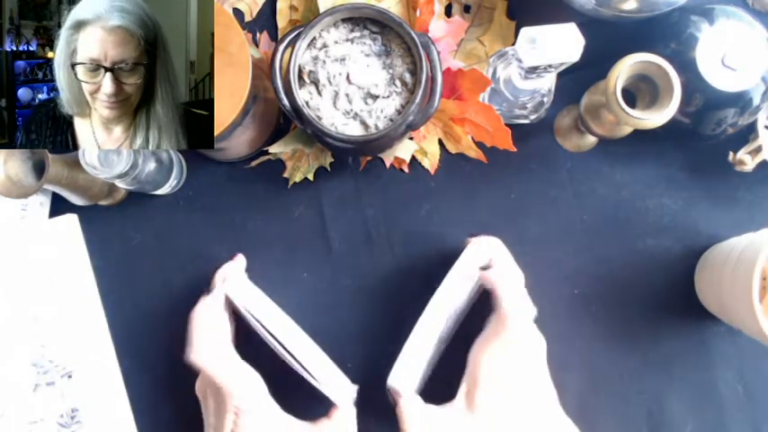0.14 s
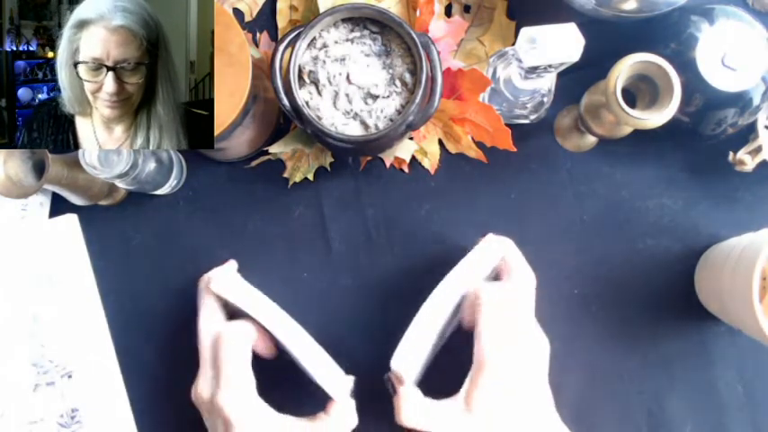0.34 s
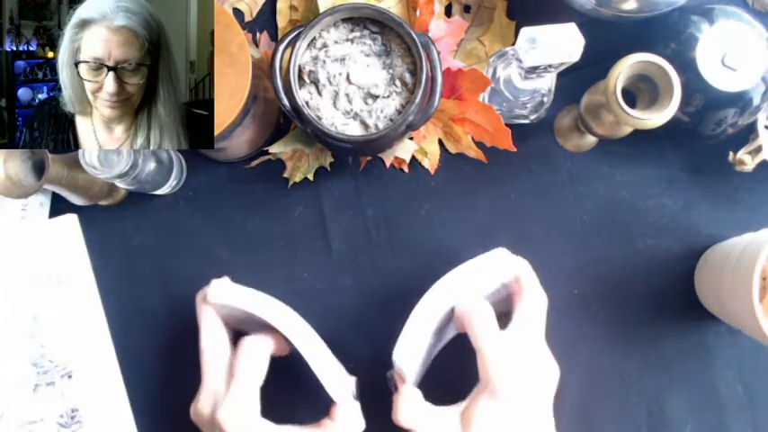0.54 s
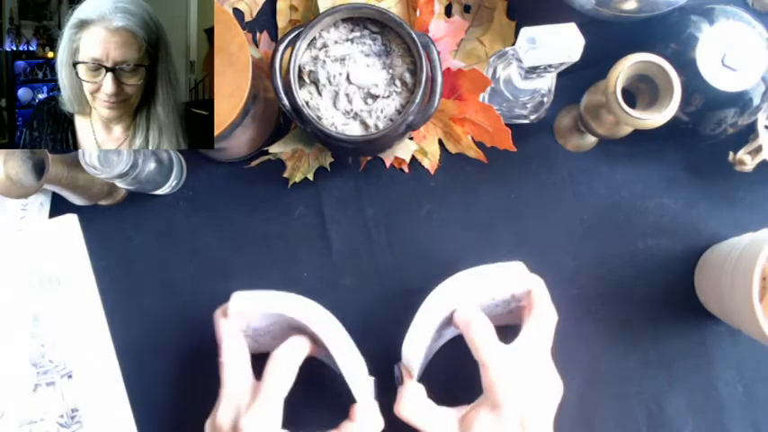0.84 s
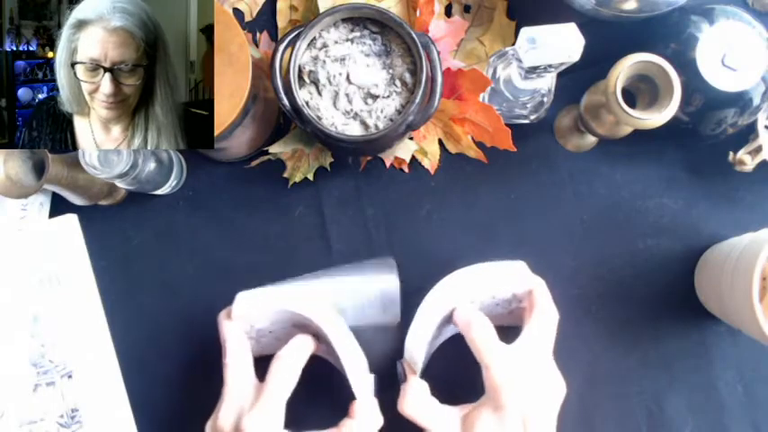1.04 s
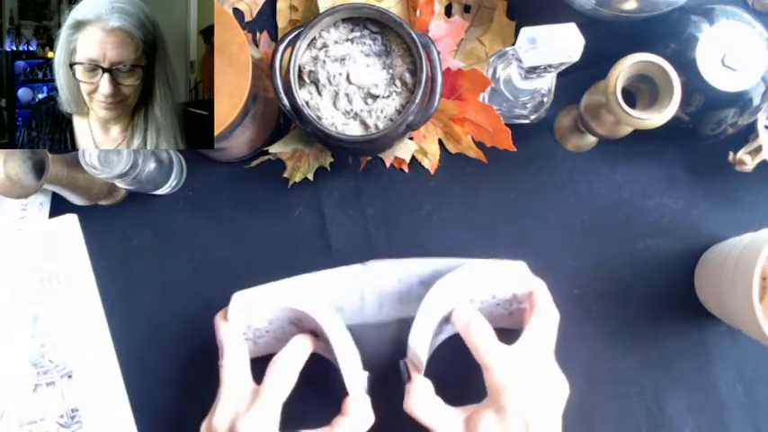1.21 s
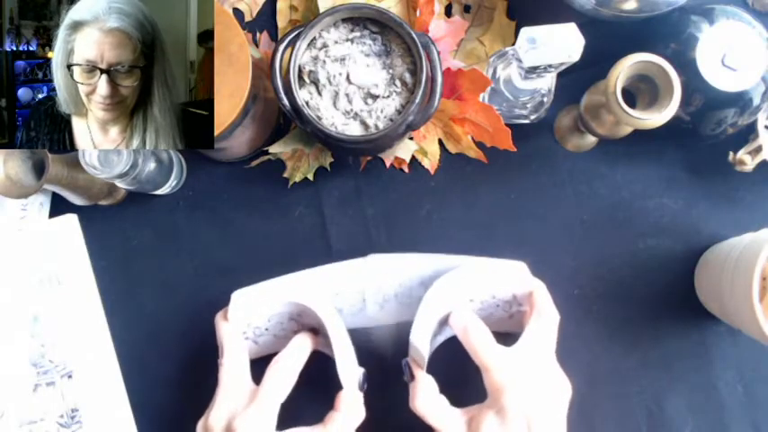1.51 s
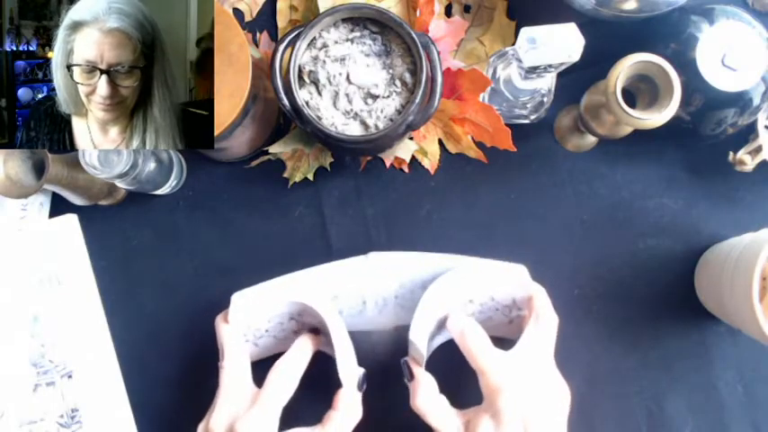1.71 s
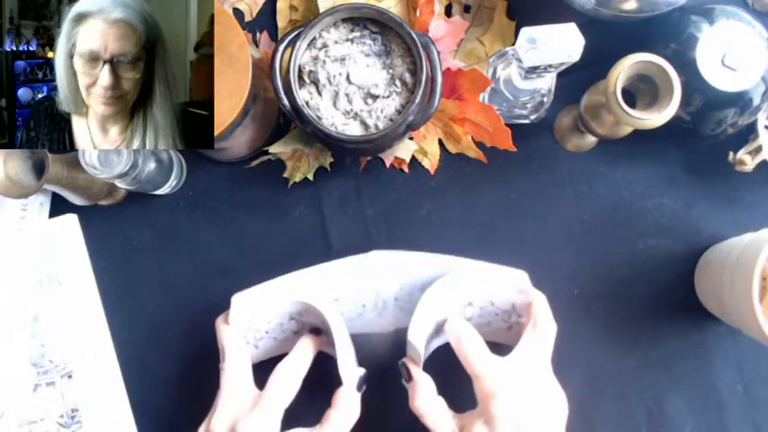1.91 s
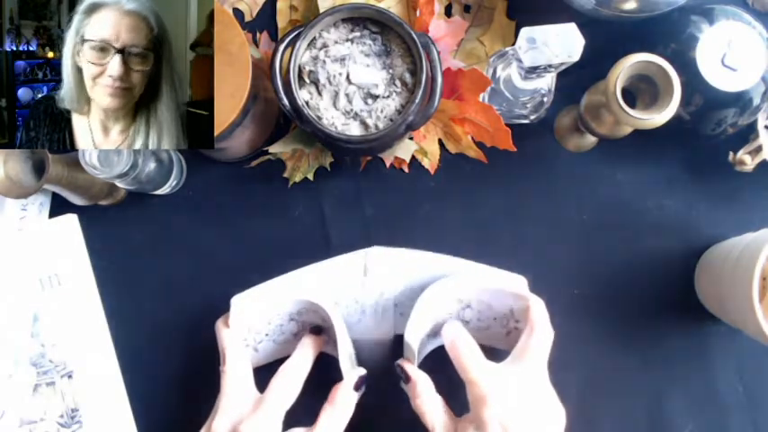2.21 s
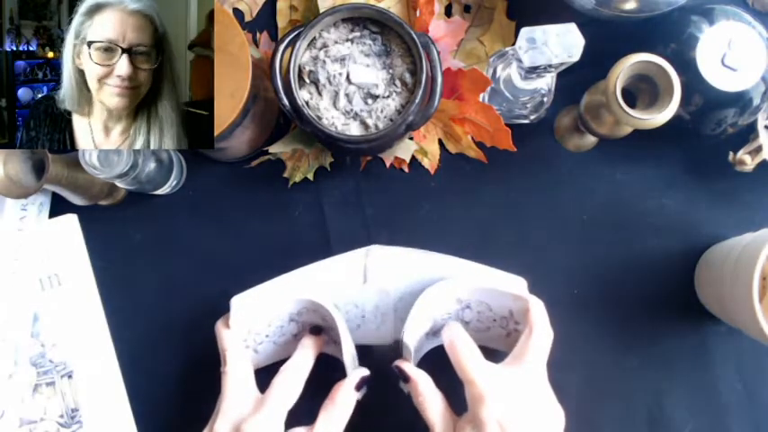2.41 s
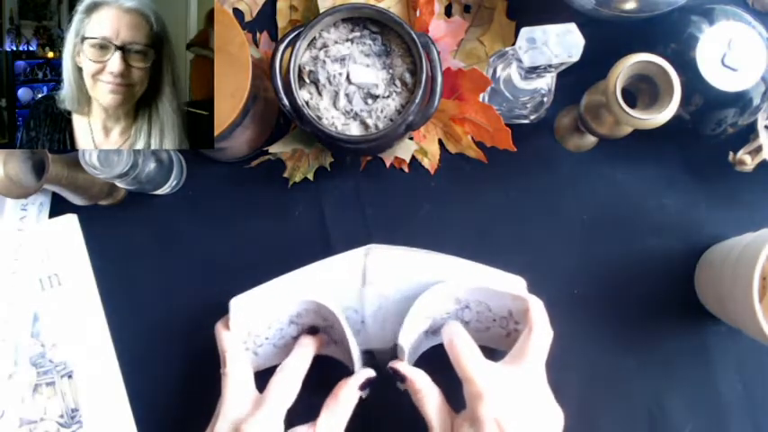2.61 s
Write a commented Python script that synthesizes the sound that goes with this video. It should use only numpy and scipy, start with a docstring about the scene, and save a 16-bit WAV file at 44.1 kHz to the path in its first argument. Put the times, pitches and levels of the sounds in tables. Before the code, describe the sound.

A deck of cards riffles together by hand in crisp, rapid, rising flicks.

```python
"""Playing cards riffle together on a cloth-covered table, the two halves of the deck getting louder.
Each card snaps off a thumb and slaps the pile, pushing out a low puff of air as it lands.
Edges slip with tiny whistles, and the packets knock on the table.
Hands rustle over the cards and shake a rumble from the table top; faint hum and hiss lie underneath."""
import sys
import numpy as np
from scipy import signal
from scipy.fft import rfft, irfft
from scipy.io import wavfile
from scipy.ndimage import uniform_filter1d

SR = 44100
rng = np.random.default_rng(int(sys.argv[2]) if len(sys.argv) > 2 else 0)


def to_wav(s):
    """Save 16-bit WAV."""
    ch = np.atleast_2d(s).T  # columns
    pcm = np.round(np.clip(ch, -1, 1) * 32767)  # PCM
    wavfile.write(sys.argv[1], SR, pcm.astype(np.int16))


N = 121275

# Cards leaving the thumbs; levels are relative, and the push also drives the thud:
# (time [s], rise [ms], hold [ms], snap [dB], slap [dB], sizzle [dB], push [dB])
CARD_HITS = [(0.118, 1.3, 2, -63, -61, -59, -62), (0.1321, 0.36, 1, -46.5, -61.5, -48, -72),
             (0.1967, 0.97, 1.7, -62, -68, -65, -76), (0.8186, 0.56, 1.5, -54, -46.5, -56, -44.5),
             (0.839, 0.27, 3.2, -45, -44.5, -56, -54), (0.8931, 0.06, 0.74, -49, -47, -56, -66),
             (0.9131, 2.2, 4.8, -56, -54, -58, -41), (0.9422, 0.25, 0.79, -54.0, -54, -65.0, -67),
             (0.9571, 0.27, 3, -42, -49, -38, -45), (0.9627, 1.2, 1.1, -42, -50, -56.0, -66),
             (0.9851, 0.18, 1.2, -38.5, -46.5, -43, -44), (0.9967, 0.87, 3.5, -50, -54, -48, -44),
             (1.0071, 1.7, 0.6, -48, -47, -57, -52), (1.015, 4.8, 0.4, -51, -51.5, -51, -46.5),
             (1.0254, 3, 1.05, -35, -36.5, -40, -40.5), (1.0844, 0.51, 1.3, -48.5, -48, -44, -72),
             (1.1021, 0.099, 0.75, -40.5, -47, -34, -42), (1.1174, 1.5, 2, -40.5, -43, -40, -48.5),
             (1.1483, 0.21, 0.75, -51, -46.5, -66, -70), (1.1558, 1.7, 1.5, -70, -50, -68, -54),
             (1.1659, 0.27, 0.7, -37.5, -48, -35, -43.5), (1.1754, 1.9, 1.5, -39, -42.5, -40, -42.5),
             (1.2, 1.1, 1.1, -55, -45, -65, -62), (1.2084, 2.6, 1.7, -43.5, -49, -40, -67),
             (1.217, 0.092, 0.94, -39, -55, -35.5, -42.5), (1.2276, 2.5, 1.3, -40, -41.5, -58, -40.5),
             (1.2497, 0.071, 1.7, -35.5, -48, -31.5, -42.5), (1.265, 0.82, 1, -54.0, -46, -46, -72),
             (1.284, 0.33, 1, -43.5, -44, -47, -45), (1.3, 1.4, 1.4, -40, -43.5, -38.5, -47),
             (1.318, 0.6, 0.61, -44, -42, -50, -71), (1.327, 0.3, 0.71, -42, -49, -60, -72),
             (1.3332, 0.16, 0.78, -33.5, -43, -29.5, -57), (1.344, 0.89, 0.74, -40.5, -50, -44, -42),
             (1.3766, 0.85, 0.52, -36.5, -36.5, -53, -57), (1.383, 0.55, 0.87, -41, -44.5, -58, -79),
             (1.391, 0.2, 1.4, -35.5, -51, -32.5, -43.5), (1.4, 0.65, 0.85, -42, -41.5, -40, -47),
             (1.4373, 0.85, 1.4, -44, -45.5, -66, -70), (1.4572, 0.23, 0.69, -37, -44, -29.5, -39.5),
             (1.485, 0.46, 1.2, -47, -45.5, -46, -85), (1.5007, 0.28, 1, -46, -49.5, -55, -44),
             (1.516, 0.073, 1.1, -31.5, -40, -30, -43.5), (1.5424, 0.92, 1.1, -39, -45.5, -59, -45.5),
             (1.557, 0.23, 0.3, -28.5, -36, -32, -39.5), (1.5932, 0.23, 1.8, -49, -47.5, -48, -39.5),
             (1.6092, 3.3, 1.6, -47, -46.5, -59, -62.0), (1.627, 0.17, 0.9, -30, -40.5, -33, -38),
             (1.651, 1, 0.6, -39, -54, -46, -76), (1.6632, 0.26, 0.63, -32, -40, -28.5, -43.5),
             (1.6694, 0.79, 0.2, -36, -45, -56, -69), (1.682, 0.28, 2, -30, -44, -25, -37.5),
             (1.6936, 0.28, 0.58, -31.5, -40.5, -29.5, -40.5), (1.7454, 0.74, 0.9, -50, -49, -44, -59),
             (1.7601, 0.29, 1.3, -33, -41.5, -29, -38.5), (1.7759, 0.16, 0.47, -30, -43.5, -29, -41),
             (1.7985, 0.42, 0.9, -47, -43.5, -54, -46), (1.812, 1.6, 0.77, -47, -46, -42, -38.5),
             (1.8282, 0.13, 1, -31, -37.5, -19, -43), (1.8574, 0.13, 0.74, -42, -47, -49, -72),
             (1.861, 1.5, 0.5, -46, -51, -42, -40.5), (1.875, 0.22, 0.45, -31, -38.5, -28.5, -42),
             (1.8827, 0.83, 1, -40, -43.5, -56, -57), (1.8956, 0.41, 1.4, -57, -44, -59, -51),
             (1.9052, 0.54, 1.2, -50, -61, -62, -40.5), (1.918, 0.68, 0.93, -29.5, -39, -24.5, -33),
             (1.9427, 1.5, 1, -42, -45, -57, -58), (1.949, 3.4, 1.7, -46.0, -51, -62, -38),
             (1.9637, 0.28, 0.52, -26.5, -38.5, -32, -69), (1.9848, 0.33, 1.3, -42, -45.5, -51, -76),
             (1.9912, 0.3, 1.2, -43, -44, -45, -73), (1.9973, 0.26, 1.5, -35, -42.5, -29, -39),
             (2.002, 0.25, 1.4, -33.5, -50, -30, -69), (2.0242, 0.78, 0.6, -43, -43.5, -65, -71),
             (2.0375, 1.9, 1.3, -38.5, -46, -55, -41), (2.0517, 0.33, 0.67, -32, -37.5, -31, -38.5),
             (2.0538, 2.7, 1.3, -44, -40, -57, -54), (2.0667, 1.7, 1.5, -68, -43, -68.0, -35),
             (2.072, 2.2, 0.88, -37, -51, -57, -65), (2.0851, 0.47, 0.44, -28.5, -35, -28, -38),
             (2.0951, 1.9, 1.1, -34.5, -49, -60, -67), (2.1073, 2.1, 1.1, -50, -49.0, -55, -39),
             (2.1133, 2.8, 1.5, -40, -53, -46, -70), (2.1276, 0.25, 1.7, -35.5, -37.5, -34, -41),
             (2.1411, 0.73, 0.75, -29, -43, -53, -54), (2.1522, 0.16, 2.2, -32, -44, -37.0, -38),
             (2.1551, 2.1, 1.8, -38, -41, -38, -44), (2.1991, 0.77, 0.63, -37, -44.5, -48, -62.0),
             (2.2098, 2.6, 1.0, -58, -47, -69, -37.5), (2.216, 0.72, 1.5, -35.5, -62, -55, -67),
             (2.2272, 0.17, 0.69, -28.5, -37.5, -29, -42), (2.2391, 0.33, 0.54, -29, -35.5, -56, -37),
             (2.257, 0.66, 0.54, -29, -39.5, -26, -43), (2.2843, 0.99, 1.1, -42, -60, -48, -64),
             (2.2956, 0.35, 1.1, -35.5, -38.5, -29.5, -38.5), (2.3115, 2.5, 1.3, -35, -61, -52, -70),
             (2.3244, 0.11, 0.75, -31.5, -39, -30, -41.5), (2.334, 2.6, 1.3, -31, -46, -44.0, -62.0),
             (2.3421, 0.39, 2.4, -34.5, -41.5, -37, -37.5), (2.3482, 0.21, 1.1, -31.5, -44, -30, -49),
             (2.3544, 1.8, 0.88, -33, -37, -44.0, -60), (2.3648, 1.3, 6.1, -42, -46, -45, -36.5),
             (2.3741, 4.3, 0.79, -26.5, -51, -44.0, -69), (2.383, 0.32, 1.3, -32.5, -32.5, -38.0, -35.5),
             (2.3881, 0.31, 1, -24, -45, -25, -68), (2.4719, 2.6, 0.68, -36, -44, -43, -60),
             (2.4829, 0.098, 3.1, -35.5, -38.5, -37, -39), (2.4925, 1.2, 0.56, -47, -51, -59, -40),
             (2.506, 1.9, 1.5, -28.5, -40.5, -51, -70), (2.5165, 0.2, 1, -18.5, -33.5, -18.5, -43),
             (2.5321, 0.82, 1.1, -26, -37.5, -54, -40.5), (2.542, 4.6, 0.6, -23.5, -37, -47, -39.5),
             (2.565, 3.7, 1.3, -25, -36, -40, -55), (2.5771, 1.6, 2.6, -39, -40, -36, -35),
             (2.5937, 4.5, 6.2, -25, -38, -46, -68), (2.6063, 0.2, 0.77, -12.5, -25, -17.5, -71),
             (2.6318, 2.7, 1.3, -31, -46, -49, -68), (2.6363, 0.65, 0.58, -30, -53, -44, -72),
             (2.644, 1.3, 0.6, -30, -31, -52, -36), (2.6612, 0.3, 0.37, -21.5, -57, -32, -70),
             (2.6666, 1.2, 0.91, -24.5, -26, -44, -40), (2.6744, 0.96, 0.72, -29, -32, -25, -55),
             (2.6847, 2.6, 1.4, -35, -72, -54, -46.5), (2.6982, 2.6, 1.9, -25.5, -31.5, -35, -72),
             (2.707, 3.3, 1.3, -26, -32, -30, -33.5)]
# Tone of a card: (frequency [Hz], gain [dB])
CARD_EQ = [(71, -32), (120, -12.5), (317, -22.5), (390, -12), (615, -17), (1050, -5), (1530, -11),
           (1960, -6.5), (3090, -7), (4480, -9), (5510, -2.5), (7060, -1), (10200, -7.5), (15200, -3.5),
           (16800, -31)]
# A card's four bands, in the order snap, slap, sizzle, thud: (low edge [Hz], high edge [Hz])
BAND_EDGES = [(3200, 9800), (650, 3200), (9800, 17500), (130, 650)]
BAND_DECAY = [1.89, 3.27, 1.12, 2.3]  # die-away per band: (time constant [ms])
BAND_GAIN = [-3.5, -4.5, -7, -14]  # balance per band: (gain [dB])
TICK_GAIN = [17, 16, 17, 13]  # opening tick per band: (gain [dB])
FLUTTER_GAIN = [-8.5, -12, -10, -8]  # the card fluttering on, per band: (gain [dB])
ROOM_SEND = [-12.5, -10, -13, -13.5]  # room tail per band: (gain [dB])
ROOM_T60 = [0.16, 0.12, 0.14, 0.06]  # room decay per band: (time to fall 60 dB [s])
# Card edges slipping: (time [s], pitch [Hz], level [dB])
EDGE_SLIPS = [(2.5455, 7600, -27), (2.5685, 7300, -21), (2.6344, 5260, -17), (2.639, 5270, -16.5),
              (2.661, 6130, -20), (2.7, 7900, -23)]
# Packets hitting the table: (time [s], relative level [dB], best-excited pitch [Hz], tuning [ratio])
PACKET_KNOCKS = [(0.113, -41, 444, 1.1), (0.132, -39, 440, 1.17), (0.196, -44, 380, 0.86),
                 (.84, -27.5, 270, 0.94), (0.847, -27.5, 900, 0.98), (.96, -28, 264, 1.02),
                 (0.966, -28, 900, .99), (1.881, -34, 230, 1.28), (1.918, -27.5, 258, 1.46),
                 (2.667, -25, 374, 0.88), (2.677, -31.5, 420, 1.3)]
# Modes of a knock: (frequency before tuning [Hz], gain [dB], time to fall 60 dB [s])
KNOCK_MODES = [(126, -2, 0.049), (180, -11, 0.071), (408, -11, 0.055), (795, -11.5, 0.027),
               (1038, -9, 0.031)]
# Hands sliding over the cards: (time [s], level [dB])
RUSTLE_FADER = [(0., -73.5), (.1, -72.5), (.13, -67), (.26, -69.5), (.31, -78.5), (.62, -76), (.705, -69.5),
                (.715, -64), (.76, -67), (.81, -69.5), (1., -65.5), (1.65, -61.5), (1.73, -61.5),
                (1.9, -55), (2.19, -60), (2.36, -51), (2.44, -66.5), (2.5, -54), (2.62, -43), (2.65, -50),
                (2.69, -54), (2.75, -50.5)]
# Tone of the rustle: (frequency [Hz], gain [dB])
RUSTLE_EQ = [(290, -5.5), (500, -4), (605, -7), (7490, -6.5), (15000, -27), (16800, -36)]
# Table shaking under the hands: (time [s], level [dB])
RUMBLE_FADER = [(0., -73), (.085, -62.5), (.12, -51.5), (.27, -53.5), (.32, -75), (.8, -69.5), (.84, -49),
                (1.7, -49.5), (1.73, -56), (1.85, -52), (1.89, -37.5), (1.97, -39), (2.05, -45.5),
                (2.39, -56.5), (2.44, -61), (2.68, -35.5), (2.75, -94)]
# Tone of the rumble: (frequency [Hz], gain [dB])
RUMBLE_EQ = [(8.8, -17), (15, 8), (117, -7), (203, -16), (241, -18), (900, -33.5), (1170, -67),
             (1980, -120)]
# Low room noise and hiss: (frequency [Hz], gain [dB])
ROOM_TONE_EQ = [(8.8, -31), (15, 6.5), (121, -7), (172, -15.5), (319, -21), (816, -44.5), (15000, -35),
                (16800, -67)]
# Steady hum: (frequency [Hz], level [dB])
HUM_TONES = [(118.4, -68.5), (317.6, -80)]


def card_snaps():
    """Each card snaps off a thumb and slaps the pile: a sharp tick, crackle, flutter and room tail."""
    ms = np.arange(2000) / SR * 1000
    decay_ms, flutter_ms = np.array(BAND_DECAY)[:, None], 3.5
    flutter = amp(FLUTTER_GAIN)[:, None] * np.exp(-ms / flutter_ms)
    envelopes, ticks = np.zeros((4, N)), np.zeros((4, N))
    for start, rise, hold, *levels_db in CARD_HITS:
        attack = np.minimum(ms / rise, 1) ** 1.7
        release = np.exp(-np.maximum(ms - rise - hold, 0) / decay_ms)
        add(envelopes, start, attack * (release + flutter) * amp(levels_db)[:, None])
        tick = amp(levels_db) * amp(TICK_GAIN) * np.exp(-rise)  # a slow attack softens the tick
        add(ticks, start + rise / 1000, tick[:, None])
    drive = crackle(spread_db=2.5) * envelopes + ticks + room_tail(envelopes)
    body, out = impulse_response(CARD_EQ), np.zeros(N)
    for band_drive, edges, db in zip(drive, BAND_EDGES, BAND_GAIN):
        band = signal.sosfilt(signal.butter(5, edges, "band", fs=SR, output="sos"), body)
        out += amp(db) * signal.oaconvolve(band_drive, band / np.linalg.norm(band))[:N]
    return out


def crackle(spread_db):
    """The grit in a snap: tiny ticks of uneven size, levelled over about 2 ms."""
    size = amp(spread_db * np.minimum(rng.exponential(1, N), 4))
    ticks = size * rng.standard_normal(N)
    return ticks / np.sqrt(uniform_filter1d(ticks ** 2, size=100))


def air_puffs():
    """A falling card squeezes air out: pressure builds, drops at the landing, the table swings back."""
    build_ms, drop_ms, landing_ms, rush_ms = 5.5, 3.02, 2.45, 0.71
    swing_hz, damping, lead_samples = 37.1, 0.17, 1500
    ms = np.arange(-lead_samples, 4000) / SR * 1000 - landing_ms  # zero at the landing
    pressure = np.where(ms < 0, np.exp(ms / build_ms), np.exp(-(ms / drop_ms) ** 2))
    pressure += 0.48 * np.exp(-(ms / rush_ms) ** 2)  # the last rush of air
    omega = 2 * np.pi * swing_hz
    table_swing = signal.bilinear([1, 0, 0], [1, 2 * damping * omega, omega ** 2], SR)
    puff, out = signal.lfilter(*table_swing, pressure), np.zeros(N)
    for start, *_, push_db in CARD_HITS:
        add(out, start - lead_samples / SR, amp(push_db + 2) * puff / abs(puff).max())
    return out


def edge_slips():
    """A slipping card edge whistles for a few cycles of one pitch."""
    ms, out = np.arange(600) / SR * 1000, np.zeros(N)
    rise_ms, decay_ms = 0.33, 0.79
    envelope = (1 - np.exp(-ms / rise_ms)) * np.exp(-ms / decay_ms)
    for start, hz, db in EDGE_SLIPS:
        add(out, start, amp(db) * envelope / envelope.max() * sine(hz, ms / 1000))
    return out


def packet_knocks():
    """A packet knocks on the table and rings a few modes, favouring those near its best-excited pitch."""
    t, out = np.arange(5000) / SR, np.zeros(N)
    hz, mode_db, t60 = np.transpose(KNOCK_MODES)[..., None]
    attack = np.minimum(t / .001, 1)
    for start, level_db, best_hz, tuning in PACKET_KNOCKS:
        loss_db = 6.5 * np.log2(tuning * hz / best_hz) ** 2  # 6.5 dB down one octave away
        modes = amp(mode_db - loss_db - 60 * t / t60) * sine(tuning * hz, t)
        add(out, start, amp(level_db) * attack * modes.sum(0))
    return out


def hand_rustle():
    """Fingers and card faces slide with a grainy swish."""
    grain_db = 3 * unit_rms(uniform_filter1d(rng.standard_normal(N), size=150))
    return fader(RUSTLE_FADER) * unit_rms(amp(grain_db) * shaped_noise(RUSTLE_EQ))


def table_rumble():
    """The table top shakes under the hands."""
    return fader(RUMBLE_FADER) * shaped_noise(RUMBLE_EQ)


def room_tail(envelopes):
    """The room answers the cards about 3 ms later with a diffuse wash that dies away."""
    feedback = 10 ** (-6 / (np.array(ROOM_T60) * SR))
    delayed_power = np.roll(envelopes ** 2, 130, axis=1)
    power = [signal.lfilter([1 - r], [1, -r], band) for r, band in zip(feedback, delayed_power)]
    return amp(ROOM_SEND)[:, None] * np.sqrt(power) * rng.standard_normal(envelopes.shape)


def room_tone():
    """A quiet bed of low room noise, hiss and two hum tones."""
    t = np.arange(N) / SR
    hum = sum(amp(db) * np.sqrt(2) * sine(hz, t) for hz, db in HUM_TONES)
    return amp(-64) * shaped_noise(ROOM_TONE_EQ) + hum


def amp(db):
    """Decibels to amplitude."""
    return 10 ** (np.asarray(db) / 20)


def unit_rms(x):
    """The signal levelled to rms 1."""
    return x / np.sqrt(np.mean(x ** 2) + 1e-20)


def sine(hz, t):
    """One sine per frequency, each at a random phase."""
    return np.sin(2 * np.pi * (hz * t + rng.random(np.shape(hz))))


def eq_gain(eq, hz):
    """Amplitude of an EQ curve, drawn on a log frequency axis."""
    points_hz, db = np.transpose(eq)
    return amp(np.interp(np.log(hz + 1), np.log(points_hz + 1), db))


def fader(points):
    """A gain ride through (time [s], level [dB]) points."""
    t, db = np.transpose(points)
    return amp(np.interp(np.arange(N) / SR, t, db))


def add(mix, start, sound):
    """Lay a sound into the mix at start [s]."""
    part = mix[..., round(start * SR):][..., :sound.shape[-1]]
    part += sound[..., :part.shape[-1]]


def shaped_noise(eq):
    """Steady noise through an EQ curve, rms 1."""
    spectrum = rfft(rng.standard_normal(N)) * eq_gain(eq, np.fft.rfftfreq(N, 1 / SR))
    return unit_rms(irfft(spectrum, N))


def impulse_response(eq, size=4096):
    """A ring with the tone of an EQ curve that starts at once (minimum phase)."""
    log_gain = np.log(eq_gain(eq, abs(np.fft.fftfreq(size, 1 / SR))))
    spectrum = np.exp(np.conj(signal.hilbert(log_gain)))
    return np.fft.ifft(spectrum).real[:size // 2]


def scene():
    """The riffle over hands, table and room, in mono."""
    riffle = card_snaps() + edge_slips() + packet_knocks() + air_puffs()
    return (riffle + hand_rustle() + table_rumble() + room_tone())[None]


def record(dry):
    """A steep high cut at 16.5 kHz."""
    high_cut = signal.firwin(511, 16500, window=("kaiser", 9), fs=SR)
    return signal.oaconvolve(dry, high_cut[None], "same")


dry = scene()
out = record(dry)
to_wav(out)
```